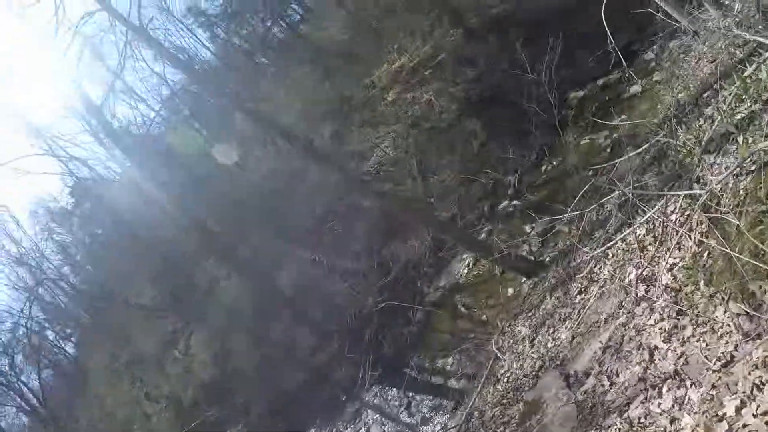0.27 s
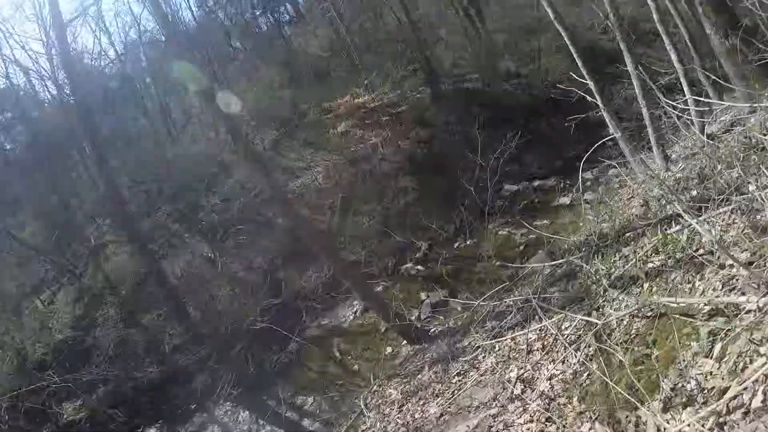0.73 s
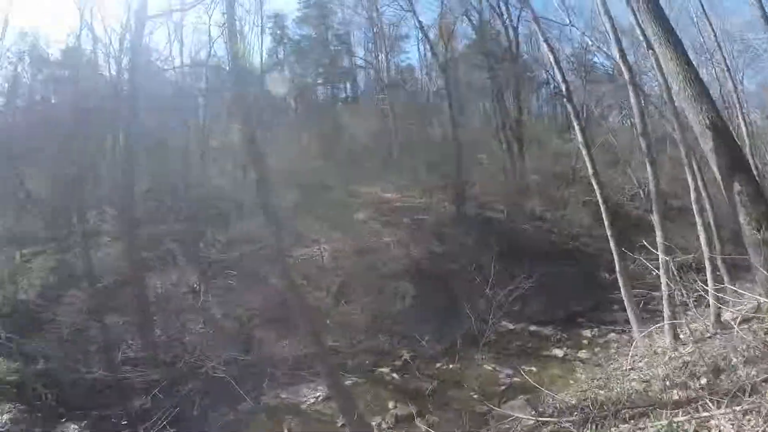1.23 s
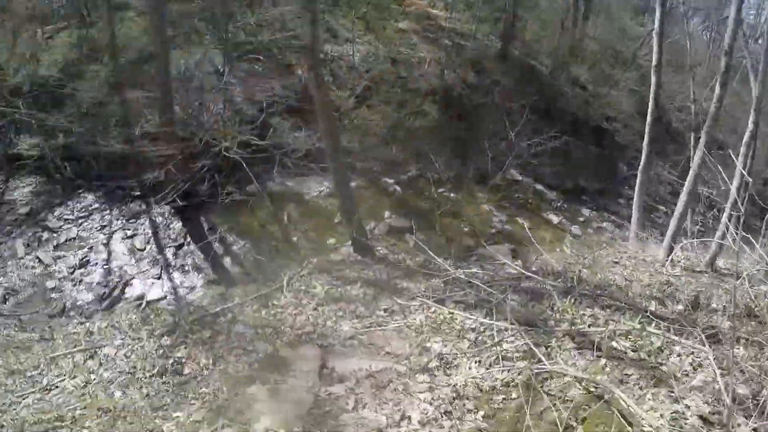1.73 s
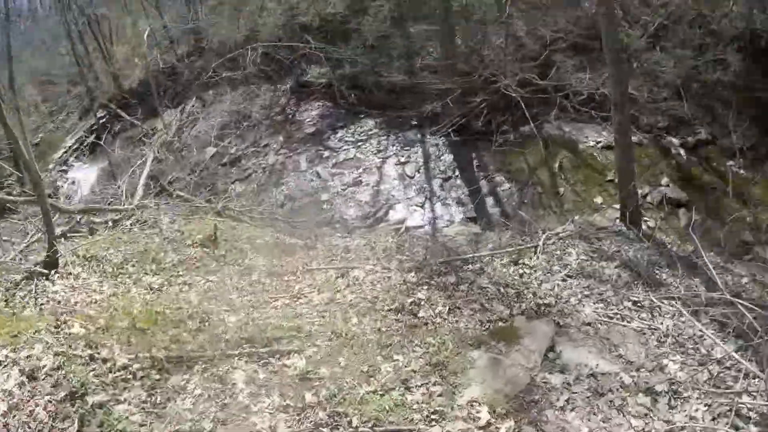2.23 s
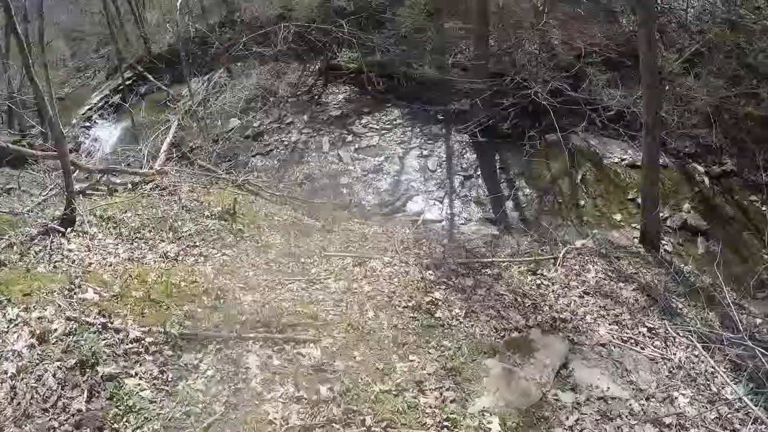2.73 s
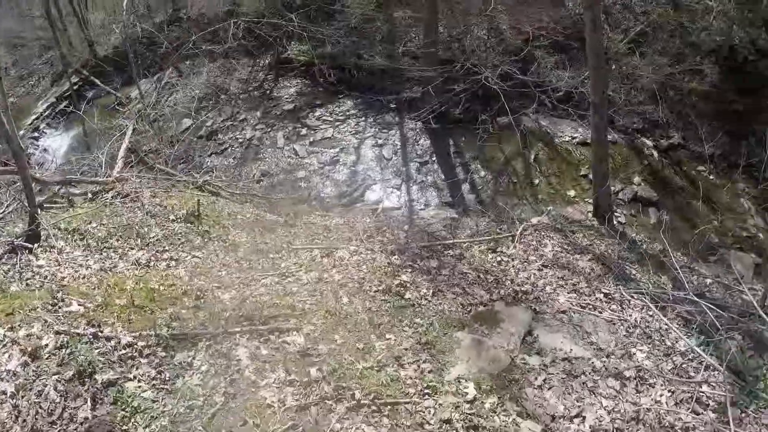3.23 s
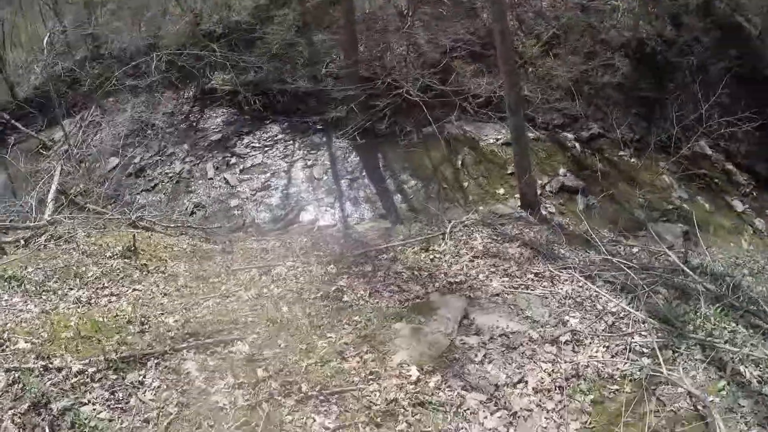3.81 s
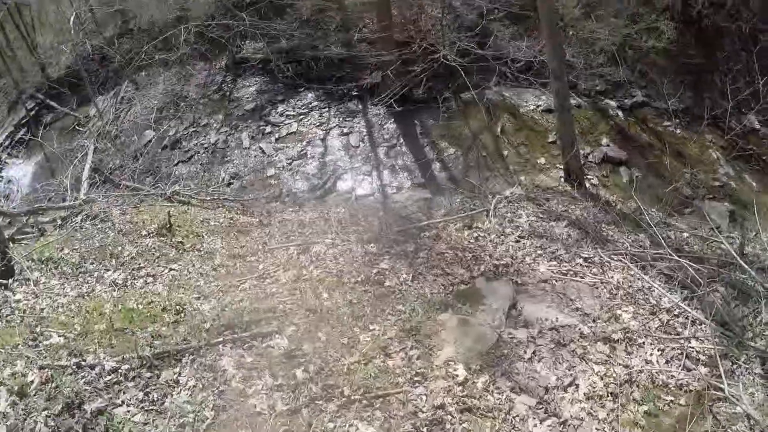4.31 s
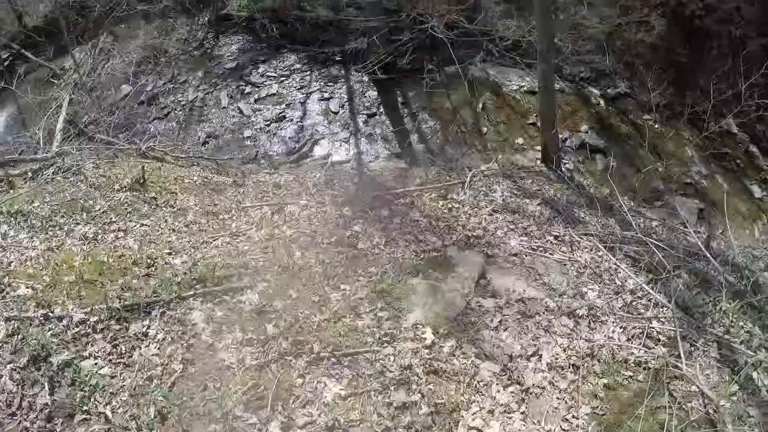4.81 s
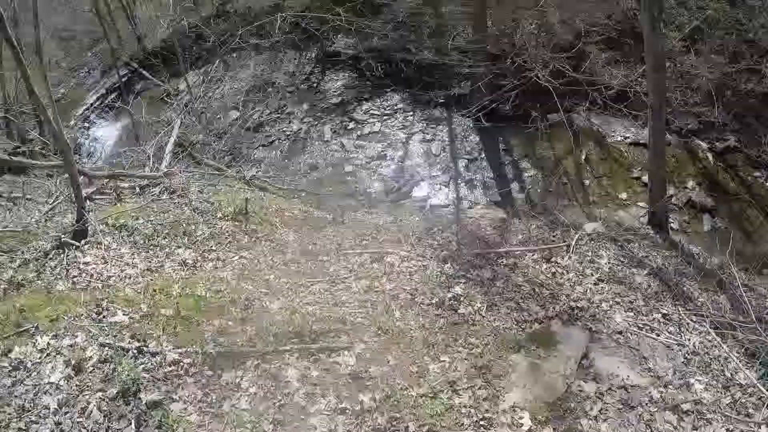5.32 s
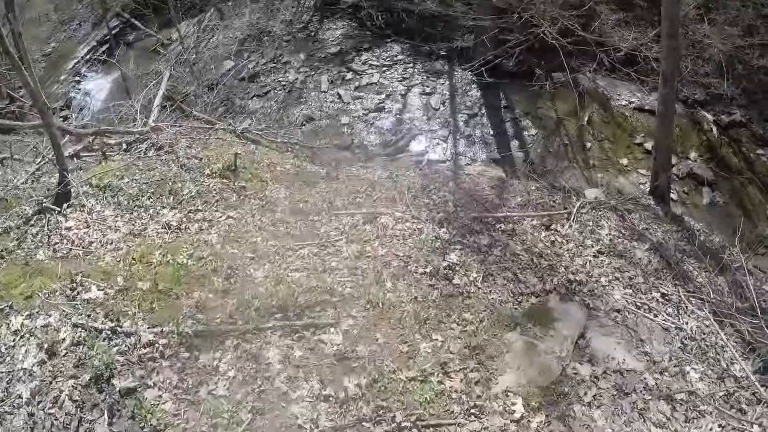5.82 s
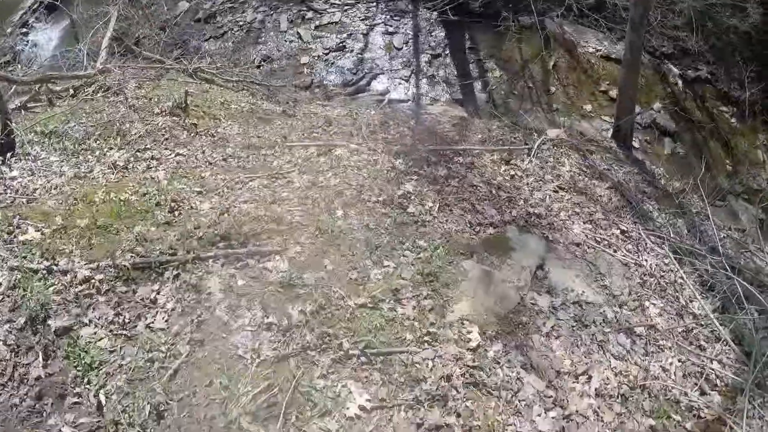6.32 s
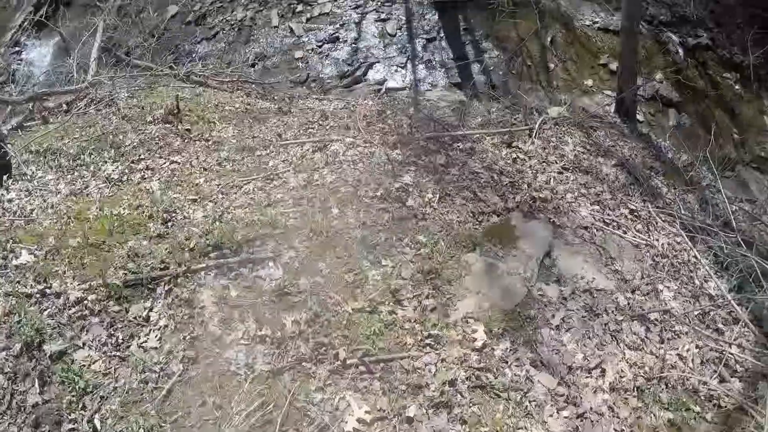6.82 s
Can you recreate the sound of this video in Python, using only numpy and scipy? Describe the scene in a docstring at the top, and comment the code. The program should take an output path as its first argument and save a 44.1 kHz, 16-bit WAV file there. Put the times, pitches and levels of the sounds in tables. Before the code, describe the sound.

Dry leaves crunch under slow feet while the microphone's hard case dominates. A strap buckle drags and catches early on; a burst of loud plastic clacks, booming mount thumps and gritty hand rubbing follows before two seconds. The rest is much quieter: scattered leaf crackles, one clear twig snap, two late hollow knocks, soft low swaying rumble and a faint steady stream behind.

```python
"""A wooded slope above a creek: slow steps through dry leaves, at the microphone of a cased camera worn on the body.
Underfoot, leaf ribs crackle as random clicks over hiss, and twigs snap as splintering clicks.
At the microphone the case clacks through its resonances and its mount thumps and sways; hand and cloth scrape it
in filtered slips. Early on a strap buckle grates and clacks; a small metal part rings in dying sines.
Behind lie the creek, as steady coloured noise, and a very faint pulsing electronic whine."""
import sys
import numpy as np
from scipy import signal
from scipy.fft import rfft, irfft, next_fast_len
from scipy.io import wavfile
from scipy.ndimage import uniform_filter1d

SR = 44100
rng = np.random.default_rng(int(sys.argv[2]) if len(sys.argv) > 2 else 0)


def transcribe(u):
    """Save the signal u as a 16-bit wav file named by the first command-line argument.

    u: samples, shape (n,) or (channels, n), limited to [-1, 1]; the rate is SR.
    q: integer samples, one column per channel.
    """
    v = np.clip(np.atleast_2d(u).T, -1, 1)
    q = np.round(v * 32767).astype(np.int16)
    wavfile.write(sys.argv[1], SR, q)


N = 311346  # length in samples

# Feet pressing into the leaves. Each row: time of full pressure in seconds, hold in seconds,
# give time in seconds, crush level in dB, crisp top in dB relative to the crush (before a common lift).
FOOT_PRESSES = [(0.137, 0.073, 0.21, -63.5, -2), (.32, 0.035, .13, -40, -24), (.51, 0.027, .25, -47, -16),
                (.765, .025, .2, -44, -15), (0.886, 0.075, 0.2, -64.5, -3.5), (1.355, .03, .12, -50, -9),
                (1.46, .02, .2, -48.5, -11.5), (1.66, 0.16, .25, -51, -12.5),
                (1.849, 0.047, 0.057, -47.5, -3), (1.92, 0.055, .04, -39.5, -6),
                (2.07, 0.054, .18, -58, -3), (3.37, .06, .06, -52.5, -7), (3.59, .06, .3, -50.5, -5),
                (3.875, .11, .3, -44, -11.5), (4.13, .08, .2, -56.5, -1.5), (4.379, 0.029, .28, -42.5, -16),
                (4.58, .07, .3, -51, -9.5), (4.81, 0.0088, .2, -48.5, -7), (5.06, 0.012, .2, -54, -8),
                (5.29, .06, .22, -48, -15), (5.835, 0.054, .28, -41, -18.5), (6.11, .15, .22, -48, -11),
                (6.58, .1, .45, -46, -10.5), (6.745, 0.023, .2, -45.5, -12.5),
                (7.02, 0.054, .25, -45.5, -33)]
# Twigs breaking underfoot; the row at 1.908 s is instead a bright, broadband crack on the loudest knock of the
# case. Each row: start in seconds, peak level in dB.
TWIG_SNAPS = [(.205, -31.5), (.393, -31), (0.412, -33.5), (1.628, -30.5), (1.908, -9), (2.281, -42),
              (3.36, -29.5), (3.439, -31), (3.7292, -12), (3.731, -33), (4.419, -32.5)]
# Knocks of the case in its mount. Each row: start in seconds, clack peak in dB, clack brightness in Hz,
# thump level in dB.
CASE_KNOCKS = [(0.298, -30, 1000, -25), (.825, -39, 1000, -23.5), (0.9056, -30.5, 1700, -27.5),
               (0.9875, -24, 1450, -20), (1.041, -39, 1950, -21), (1.0625, -26.5, 1490, -32),
               (1.112, -29, 2650, -24), (1.4835, -32.5, 965, -30.5), (1.5687, -12.5, 4900, -20),
               (1.578, -9.5, 3100, -21), (1.591, -20.5, 1010, -43), (1.72, -20.5, 2200, -16.5),
               (1.771, -29, 1480, -4.5), (1.789, -12.5, 1590, -10), (1.817, -42, 1510, -5),
               (1.907, 3, 4640, -25), (1.948, -17.5, 1180, -10), (2.025, -26, 905, -11),
               (2.173, -19, 2450, -20.5), (2.522, -16.5, 1350, -19.5), (2.9799, -34, 1200, -25),
               (3.3711, -28, 1054, -21.5), (3.404, -40, 1490, -23.5), (4.357, -29, 2510, -24),
               (4.386, -30.5, 870, -16), (4.558, -36, 1100, -19.5), (5.9756, -17.5, 950, -7.5),
               (6.8077, -15, 700, -12.5), (6.828, -38, 1500, -14.5)]
# Ringing of the case. Each row: frequency in Hz, width in Hz, level in dB.
CASE_RESONANCES = [(455, 310, -14.5), (645, 30, -2), (735, 43, 1.5), (950, 243, -3), (1310, 160, -2.5),
                   (1630, 68, -1.5), (2087, 270, 2), (2450, 198, 5.5), (2600, 240, 0), (3380, 240, -1.5),
                   (4330, 190, -7), (4760, 200, -10), (5540, 120, -6), (6840, 280, -21.5),
                   (10500, 3500, -27.5)]
# Springy modes of the mount. Each row: frequency in Hz, level in dB, 60 dB decay in seconds.
MOUNT_MODES = [(35.8, -3.5, 0.45), (69.6, -9, 0.069), (101.6, -0.5, 0.12), (153, -15, 0.2)]
# A hard strap buckle dragged along. Each row: time in seconds, drag level in dB,
# share of its upper resonances from 0 to 1.
BUCKLE_DRAG = [(.09, -57, 0.75), (.15, -48.5, 1), (.20, -37, 0.46), (.255, -30, 0.02), (.275, -21, 0.65),
               (.313, -18, 0.82), (.326, -49.5, 0.6), (.35, -94.5, .9)]
# The buckle catching. Each row: start in seconds, peak level in dB, brightness in Hz.
BUCKLE_CATCHES = [(0.182, -28.5, 1110), (0.222, -19.5, 1090), (0.226, -24, 1090), (0.251, -23, 905),
                  (0.2944, -1.5, 1210), (0.2956, -7, 6000)]
# Ringing of the buckle. Each row: frequency in Hz, width in Hz, level in dB.
BUCKLE_RESONANCES = [(400, 190, -15), (700, 230, -12.5), (1145, 120, 5), (2200, 82, 6.5), (2724, 86, 10),
                     (2900, 330, -1), (4287, 260, -4), (5600, 290, -15), (6810, 180, -18)]
# Strokes of hand and cloth on the case. Each row: time of full friction in seconds, hold in seconds,
# friction level in dB, brightness in Hz.
CASE_STROKES = [(1.055, 0.023, -38, 3100), (1.115, 0.0042, -42, 2600), (1.163, 0.01, -44.5, 2000),
                (1.491, .14, -50, 1390), (1.574, 0.02, -32.5, 2130), (1.74, 0.063, -26, 4240),
                (1.818, 0.024, -30.5, 3880), (1.858, 0.028, -19, 4230), (1.917, 0.074, -17.5, 4200),
                (2.003, 0.1, -34, 4220), (2.109, 0.12, -45, 3270), (2.184, 0.0032, -32, 3160),
                (2.216, 0.274, -57.5, 1510), (2.54, 0.011, -26.5, 4150), (2.994, 0.0041, -55, 2000),
                (3.394, 0.024, -40.5, 2000), (5.972, 0.0025, -44, 1500), (6.792, 0.0039, -47, 1000)]
# Taps on a small metal part. Each row: start in seconds, level in dB.
METAL_TAPS = [(0, -31), (1.578, -33), (2.553, -38)]
# Modes of that part. Each row: frequency in Hz, level in dB, 60 dB decay in seconds.
METAL_MODES = [(1833, -9, 0.38), (2730, -21, .2)]
# Movement of the body, strongest while it turns. Each row: time in seconds, mount sway in dB.
BODY_SWAY = [(0, -28.5), (.22, -27), (.7, -31.5), (1.08, -28), (1.28, -35.5), (1.65, -26), (2.04, -20),
             (2.22, -35.5), (4.4, -34), (5.2, -35.5), (7.06, -34.5)]
# Resonances of the microphone's opening in the case. Each row: frequency in Hz, width in Hz, gain in dB.
PORT_RESONANCES = [(2393, 180, 10), (3567, 320, 13.5), (4460, 590, 7.5), (5545, 180, 8.5), (6825, 520, 8.5),
                   (8030, 210, 5), (10100, 1500, 2), (12400, 700, -2.5)]
# Colour of the crushed leaves. Each row: frequency in Hz, relative gain in dB.
LEAF_COLOUR = [(300, -25), (700, -10.5), (1500, -4.5), (2600, -6), (4200, -3), (6000, -4.5), (8000, -7),
               (11000, -6), (15500, -14)]
# Colour of the shaking of the handled mount. Each row: frequency in Hz, relative gain in dB.
HANDLING_COLOUR = [(15, -1.5), (35, -13.5), (65, -12), (88, -12), (108, 9.5), (130, -13.5), (155, 2.5),
                   (195, -34.5), (330, -44.5), (700, -72.5)]
# Colour of air buffeting the case. Each row: frequency in Hz, relative gain in dB.
AIR_COLOUR = [(8, -3), (20, -1), (32, -0.5), (55, -27), (100, -14.5), (170, -40.5), (300, -51), (700, -83)]
# Colour of the creek below. Each row: frequency in Hz, relative gain in dB.
CREEK_COLOUR = [(150, -1), (300, 0.5), (700, -1.5), (1500, 2), (2500, 0), (3700, -4.5), (5000, -36.5),
                (7000, -23.5), (9000, -28), (15500, -23)]

LEAF_RISE, LEAF_FALL = 1, 0.94  # a crush swells and fades by 20 dB in these shares of its give time
REST_DB, REST_CRISP_DB = -61, -8  # leaves stirring under a standing foot, and their crisp top
RUB_ATTACK_S, RUB_RELEASE_S = 0.018, 0.028  # a stroke swells and fades by 20 dB in these times
SLIPS_PER_S, FIRM_RUB_DB = 4000, -24.5  # slips of a firm rub, and the friction that counts as firm
SLIPS_FOLLOW = 0.8  # dB of slip density per dB of friction: a lighter rub breaks into separate ticks
RASP_HZ, RASP_WIDTH_HZ, RASP_DB = 1290, 400, -3.5  # rasp brought out by rubbing
DAMPED_HZ = 700  # the pressing hand damps the case below this
AIR_DB, AIR_FOLLOWS, MEAN_SWAY_DB = -36.5, 1.3, -32  # buffeting at mean sway, and its dB per dB of sway
JOLT_DB, JOLT_RISE_S, JOLT_FALL_S = -10.5, 0.0312, 0.1  # sway from a knock: dB against its thump, 20 dB times
CUTOFF_HZ = 15600  # top of the recorder's band


def leaves():
    """A harder crush breaks more leaf ribs per second, in clumps, over the hiss of sliding leaves."""
    crush_db, crisp_db = foot_pressure()
    ribs_per_s = 2500 * from_db(1.2 * (crush_db + 48.0))
    crackle = grains(ribs_per_s, spread_db=-2.5) * from_db(2.0 * drift(70))
    hiss = 0.76 * rng.standard_normal(N)
    rustle = rms_one(through_port(coloured(crackle + hiss, LEAF_COLOUR)))
    dull = cut(rustle, 4800, "low", order=1)
    # single brittle edges give way with thin, high ticks
    ticks = signal.fftconvolve(grains(110, spread_db=6.5), crack(t60=0.02, splinter=0.63))[:N]
    ticks = cut(cut(ticks, 4900, "high"), 9000, "low", order=1)
    ticks = rms_one(through_port(ticks))
    crisp = rustle - dull + from_db(-12.5) * ticks
    return from_db(crush_db) * (dull + from_db(crisp_db + 9.5) * crisp)


def foot_pressure():
    """Crush level and crispness in dB from all presses of the feet, over the stirring at rest."""
    swells = [swell(s, hold_s, LEAF_RISE * give_s, LEAF_FALL * give_s)
              for s, hold_s, give_s, _, _ in FOOT_PRESSES]
    *_, crush_db, crisp_db = np.transpose(FOOT_PRESSES)
    crisp_powers = from_db([*crisp_db, REST_CRISP_DB]) ** 2
    level_db, crisp_power = together(swells + [1], [*crush_db, REST_DB], crisp_powers)
    return level_db, 10 * np.log10(crisp_power)


def twigs():
    """Dry wood breaks with a bright, splintering crack."""
    out = np.zeros(N)
    for s, db in TWIG_SNAPS:
        snap = cut(crack(t60=0.025, splinter=0.14), 2600, "high", order=1)
        snap = through_port(cut(snap, 8500, "low", order=1))
        add(out, s, from_db(db) * snap / np.abs(snap).max())
    return out


def knocks(lag_s=0.006):
    """The case clacks against its mount, which then bounces; a harder contact reaches its higher modes."""
    out = np.zeros(N)
    for s, clack_db, bright_hz, thump_db in CASE_KNOCKS:
        add(out, s, from_db(clack_db) * clack(CASE_RESONANCES, bright_hz))
        reach_hz = np.clip(150 * (bright_hz / 1200) ** 0.61, 110, 210)
        thump = cut(struck(MOUNT_MODES, vary_db=1.5), reach_hz, "low", order=4)
        add(out, s + lag_s, -from_db(thump_db) * thump)
    return out


def buckle():
    """The buckle grates along, catches a few times and clacks; its strap tugs at the mount."""
    drag_db, upper = in_time(BUCKLE_DRAG)
    slips = ringing(grains(7000, spread_db=1.5) * from_db(0.43 * drift(120)), BUCKLE_RESONANCES)
    upper = np.clip(upper, 0, 1)
    flat_side = rms_one(cut(slips, 1300, "low"))
    edge = rms_one(cut(slips, 2000, "high"))
    grating = (1 - upper) * flat_side + upper * edge
    tug = coloured(rng.standard_normal(N), HANDLING_COLOUR)
    out = from_db(drag_db) * grating + from_db(drag_db - 9) * tug
    for s, db, bright_hz in BUCKLE_CATCHES:
        add(out, s, from_db(db) * clack(BUCKLE_RESONANCES, bright_hz))
    return out


def rubbing():
    """Skin and cloth stick and slip on the case; a firm rub also shakes the mount, most when the body swings."""
    friction_db, bright_hz = strokes()
    _, air_db = movement()
    density = from_db(SLIPS_FOLLOW * np.clip(friction_db - FIRM_RUB_DB, -35, 0))
    slips = grains(SLIPS_PER_S * density, spread_db=0.5) / np.sqrt(density)
    slips = slips * from_db(0.97 * drift(160))
    slips = cut(ringing(slips, CASE_RESONANCES), 6000, "low")
    slips = slips + from_db(RASP_DB) * resonance(slips, RASP_HZ, RASP_WIDTH_HZ)
    slips = cut(slips, DAMPED_HZ, "high", order=1)
    # the contact point wanders, so the low and high resonances swell independently
    low = cut(slips, 1420, "low", order=4) * from_db(3.55 * drift(45) - 3)
    high = cut(slips, 1900, "high", order=4) * from_db(0.5 * drift(59))
    slips = low + high
    soft = rms_one(cut(slips, 1400, "low"))
    sharp = rms_one(slips)
    speed = np.clip((bright_hz - 1000) / 3500, 0, 1)  # a faster stroke sounds sharper
    scrape = (1 - speed) * soft + speed * sharp
    shake_db = np.minimum(friction_db + 15.5, -7.5 + 0.5 * friction_db) + 0.3 * (air_db + 23.5)
    shake = coloured(rng.standard_normal(N), HANDLING_COLOUR)
    return from_db(friction_db) * scrape + from_db(shake_db) * shake


def strokes():
    """Friction in dB and brightness in Hz from all strokes on the case."""
    *_, friction_db, bright_hz = np.transpose(CASE_STROKES)
    swells = [swell(s, hold_s, RUB_ATTACK_S, RUB_RELEASE_S) for s, hold_s, _, _ in CASE_STROKES]
    return together(swells, friction_db, bright_hz)


def metal():
    """A small metal part rings on faintly after each tap, in a few dying modes."""
    out = np.zeros(N)
    for s, db in METAL_TAPS:
        add(out, s, from_db(db) * struck(METAL_MODES, vary_db=0))
    return out


def rumble():
    """Body movement keeps the mount swaying on its lowest mode; air buffets the case."""
    sway_db, air_db = movement()
    sway = resonance(resonance(rng.standard_normal(N), 34.8, 13.0), 34.8, 13.0)
    sway = sway / np.sqrt(uniform_filter1d(sway ** 2, SR // 6) + 1e-12)  # even out its own swells
    buffeting = coloured(rng.standard_normal(N), AIR_COLOUR)
    return from_db(sway_db - 1.0) * sway + from_db(air_db) * buffeting


def movement():
    """Sway of the mount and buffeting of the air in dB; both follow the body, and knocks add to the sway."""
    body_db, = in_time(BODY_SWAY)
    jolts = sum((from_db(thump_db + JOLT_DB) * swell(s, 0, JOLT_RISE_S, JOLT_FALL_S)) ** 2
                for s, _, _, thump_db in CASE_KNOCKS)
    sway_db = 10 * np.log10(from_db(body_db) ** 2 + jolts)
    return sway_db, AIR_DB + AIR_FOLLOWS * (body_db - MEAN_SWAY_DB)


def creek():
    """Even rush of the water below the slope: steady noise, coloured and heard through the port."""
    water = coloured(rng.standard_normal(N), CREEK_COLOUR)
    return from_db(-56.0) * rms_one(through_port(water))


def whine(hz=10300, pulses_hz=24.1, level_db=-71):
    """The camera's electronics give a very faint pulsing whine."""
    t = np.arange(N) / SR
    pulses = np.clip(0.5 + np.sin(2 * np.pi * pulses_hz * t), 0, 1)
    return from_db(level_db) * np.sin(2 * np.pi * hz * t) * pulses


def clack(body, bright_hz):
    """One hard contact, peak 1; a softer one is duller."""
    sound = cut(ringing(crack(t60=0.053, splinter=0.054), body), bright_hz, "low")
    return sound / np.abs(sound).max()


def ringing(x, body):
    """Contact sound reaches the microphone through the resonances of a hard body."""
    # neighbouring resonances have opposite signs
    total = sum((-1) ** k * from_db(db) * resonance(x, hz, width_hz)
                for k, (hz, width_hz, db) in enumerate(body))
    return cut(total, 370, "high", order=3)


def through_port(x):
    """Sound from the air takes on the resonances of the microphone opening."""
    for hz, width_hz, db in PORT_RESONANCES:
        x = x + (from_db(db) - 1) * resonance(x, hz, width_hz)
    return x


def struck(modes, vary_db):
    """Half a second of ringing; with vary_db, each blow shares its energy a little differently."""
    t = np.arange(SR // 2) / SR
    return sum(from_db(db + vary_db * rng.standard_normal()) * np.sin(2 * np.pi * hz * t) * dying(t, t60)
               for hz, db, t60 in modes)


def crack(t60, splinter):
    """A click followed by a quickly dying rattle of tiny contacts."""
    t = np.arange(SR // 10) / SR
    return (t == 0) + splinter * rng.standard_normal(len(t)) * dying(t, t60)


def grains(per_s, spread_db):
    """Random clicks; positive spread makes a few stand out, negative a few fall weak; rms 1."""
    sizes_db = spread_db * np.minimum(rng.exponential(1, N), 5)
    sizes = from_db(sizes_db) * rng.choice([-1, 1], N)
    return rms_one(sizes * (rng.random(N) < per_s / SR))


def swell(s, hold_s, attack_s, release_s):
    """Gain of one gesture: it rises to 1 at time s, holds and fades, by 20 dB per attack or release time."""
    t = np.arange(0, N + 40, 40) / SR - s  # worked out every 40 samples
    before = np.maximum(-t, 0) / attack_s
    after = np.maximum(t - hold_s, 0) / release_s
    gain = from_db(-20 * np.minimum(before + after, 10))
    return np.interp(np.arange(N) / SR - s, t, gain)


def together(swells, levels_db, colours):
    """Overlapping gestures add in power: their level in dB, and their colour weighted by power."""
    powers = [(gain * from_db(db)) ** 2 for gain, db in zip(swells, levels_db)]
    total = sum(powers)
    colour = sum(power * colour for power, colour in zip(powers, colours)) / total
    return 10 * np.log10(total), colour


def coloured(x, spectrum):
    """Give a steady sound a broad colour; rms 1."""
    hz, db = np.transpose(spectrum)
    size = next_fast_len(N)
    bins = np.linspace(1, SR / 2, size // 2 + 1)
    gain = from_db(np.interp(np.log(bins), np.log(hz), db))
    return rms_one(irfft(rfft(x, size) * gain, size)[:N])


def resonance(x, hz, width_hz):
    """Two-pole band-pass with gain about 1 on top."""
    r = np.exp(-np.pi * width_hz / SR)
    zeros = np.array([1, 0, -1]) * (1 - r * r) / 2
    poles = [1, -2 * r * np.cos(2 * np.pi * hz / SR), r * r]
    return signal.lfilter(zeros, poles, x + 1e-18)


def cut(x, hz, kind, order=2):
    """Butterworth low- or high-pass."""
    return signal.sosfilt(signal.butter(order, min(hz, SR / 2 - 1), kind, fs=SR, output="sos"), x)


def drift(rate):
    """Smooth chance of rms 1 that changes rate times a second."""
    return rms_one(np.interp(np.arange(N) / SR * rate, np.arange(N), rng.standard_normal(N)))


def dying(t, t60):
    """Envelope that falls 60 dB in t60 seconds."""
    return np.exp(-np.log(1000) * t / t60)


def in_time(rows):
    """Each column of a curve at every sample."""
    s, *columns = np.transpose(rows)
    return [np.interp(np.arange(N) / SR, s, column) for column in columns]


def add(out, s, sound):
    """Mix a short sound in at time s."""
    start = int(np.clip(round(s * SR), 0, N - 1))
    out[start:start + len(sound)] += sound[:N - start]


def from_db(db):
    """Decibels to gain."""
    return 10 ** (np.asarray(db) / 20)


def rms_one(x):
    """Scale to unit rms."""
    return x / np.sqrt(np.mean(x ** 2) + 1e-20)


def scene():
    """Ground, water and the sounds of the worn case meet at one microphone."""
    underfoot = leaves() + twigs()
    at_the_case = knocks() + buckle() + rubbing() + metal() + rumble()
    background = creek() + whine()
    return (underfoot + at_the_case + background)[None]


def record(dry):
    """The loudest peaks are rounded and the top is cut."""
    rounded = 1.2 * np.tanh(dry / 1.2)
    return signal.sosfilt(signal.ellip(10, 0.1, 80, CUTOFF_HZ, fs=SR, output="sos"), rounded)


dry = scene()
out = record(dry)
transcribe(out)
```